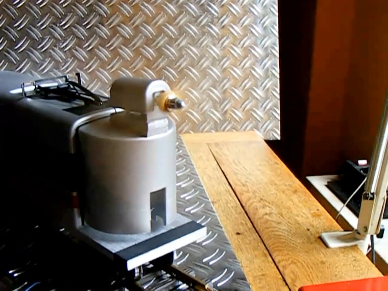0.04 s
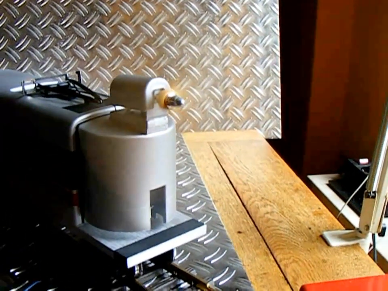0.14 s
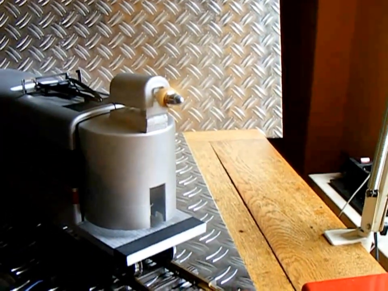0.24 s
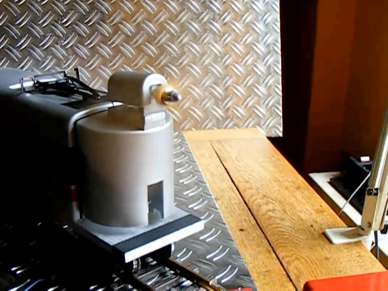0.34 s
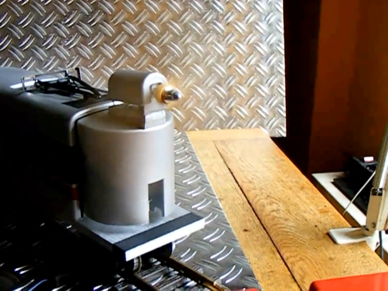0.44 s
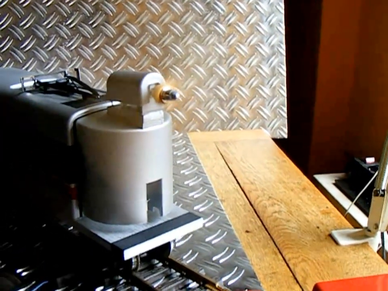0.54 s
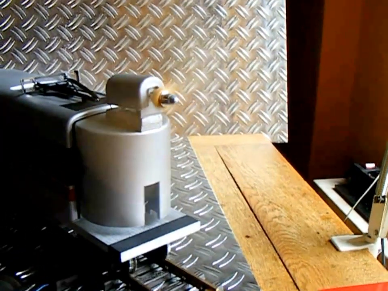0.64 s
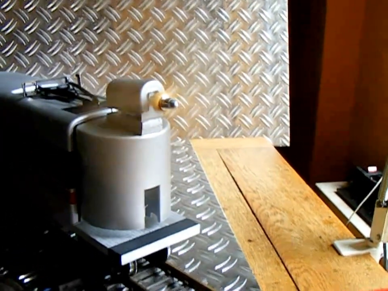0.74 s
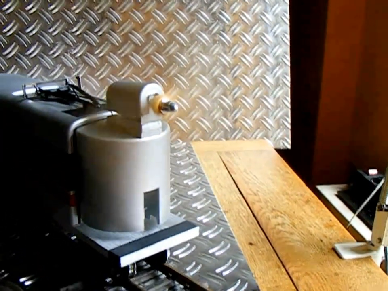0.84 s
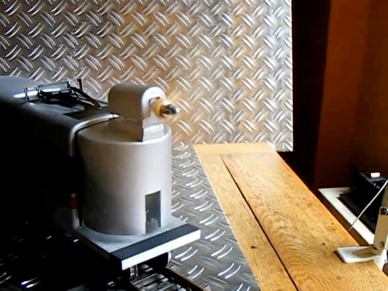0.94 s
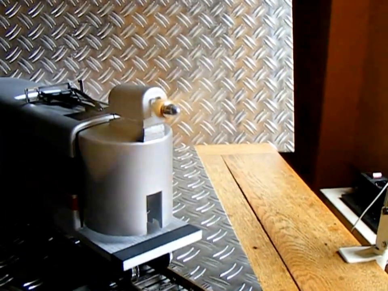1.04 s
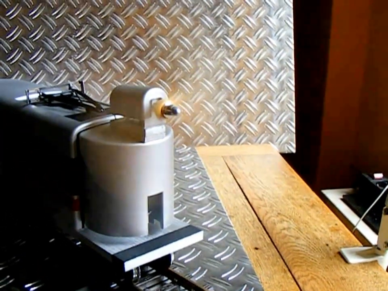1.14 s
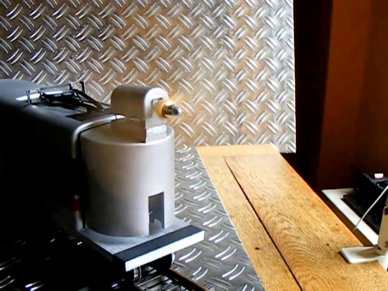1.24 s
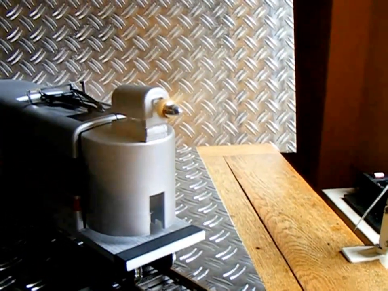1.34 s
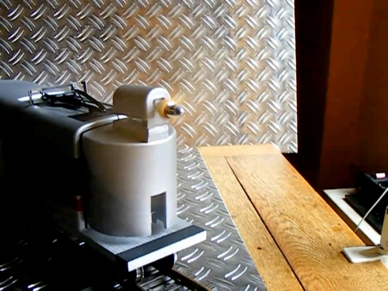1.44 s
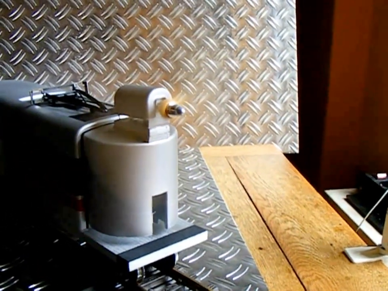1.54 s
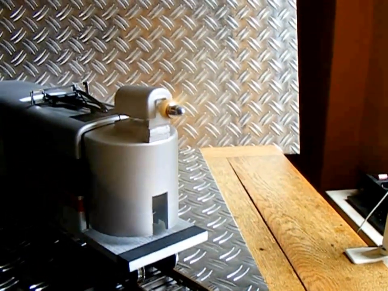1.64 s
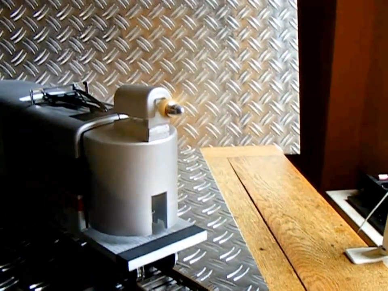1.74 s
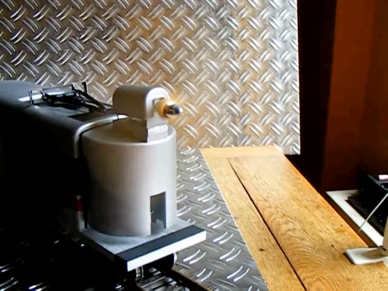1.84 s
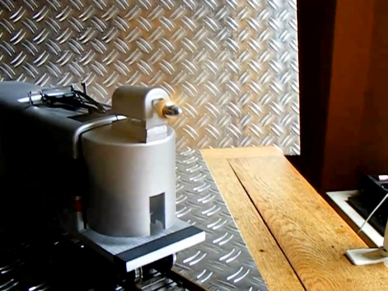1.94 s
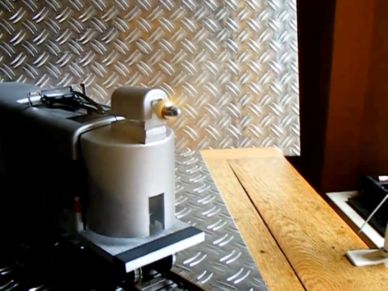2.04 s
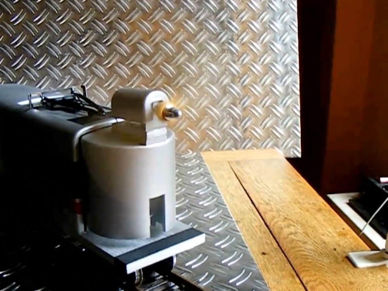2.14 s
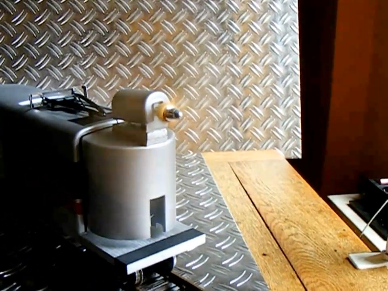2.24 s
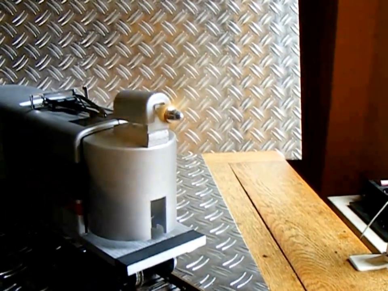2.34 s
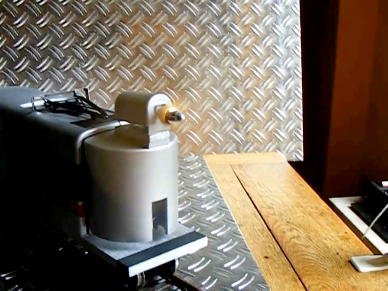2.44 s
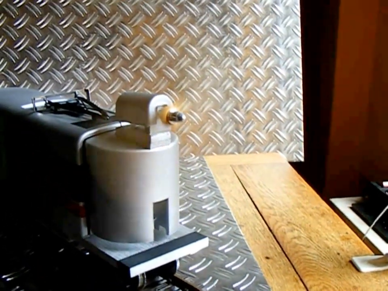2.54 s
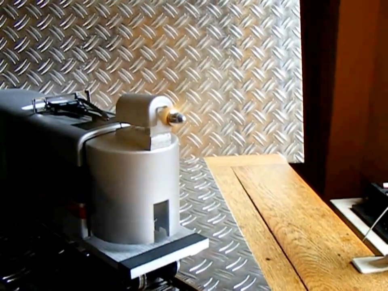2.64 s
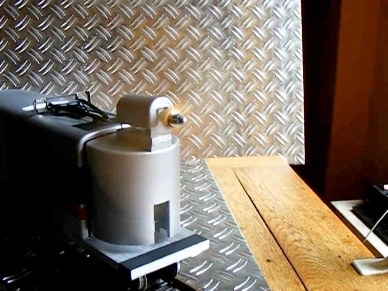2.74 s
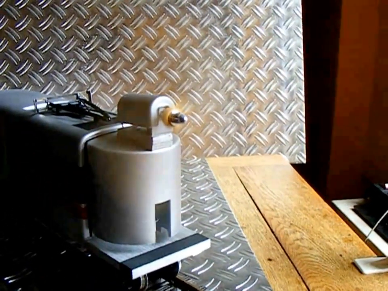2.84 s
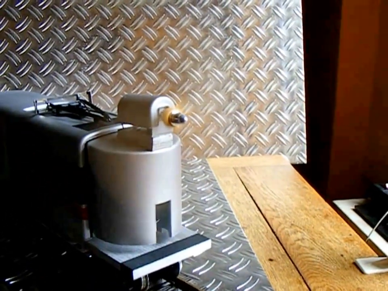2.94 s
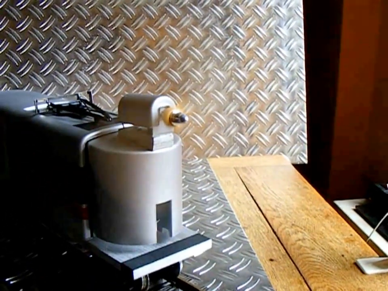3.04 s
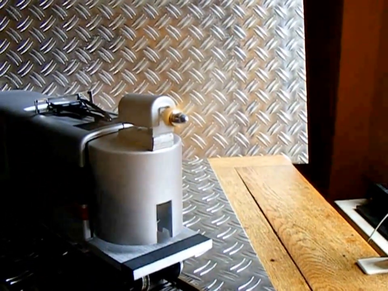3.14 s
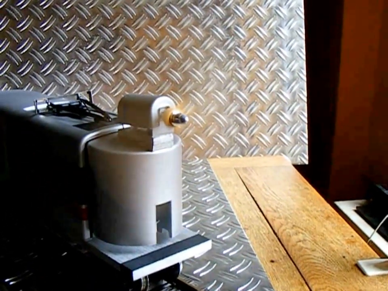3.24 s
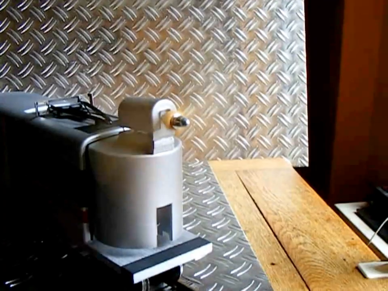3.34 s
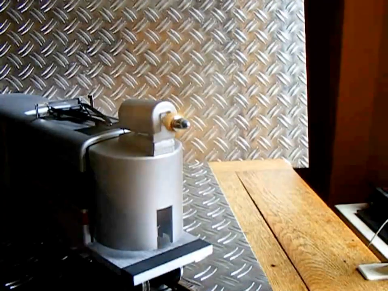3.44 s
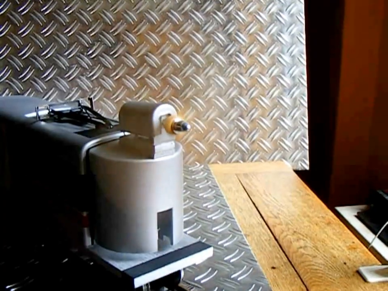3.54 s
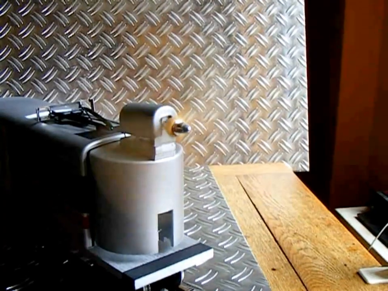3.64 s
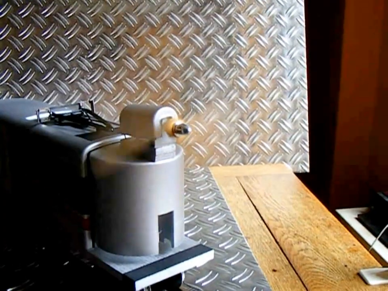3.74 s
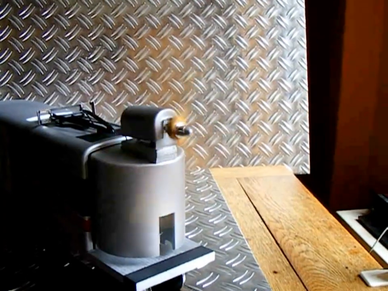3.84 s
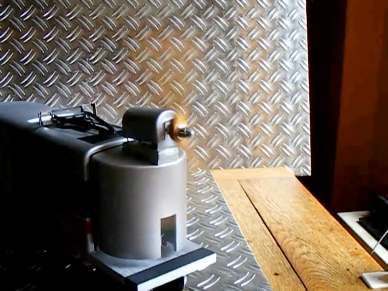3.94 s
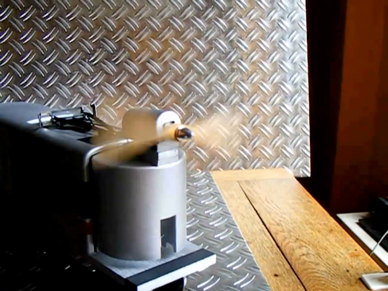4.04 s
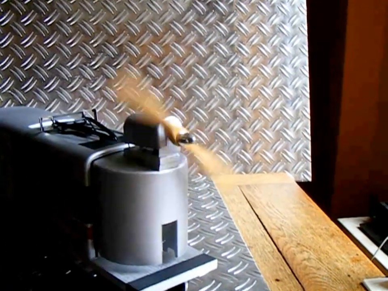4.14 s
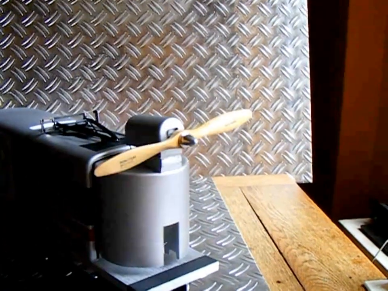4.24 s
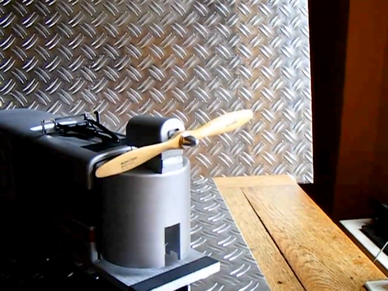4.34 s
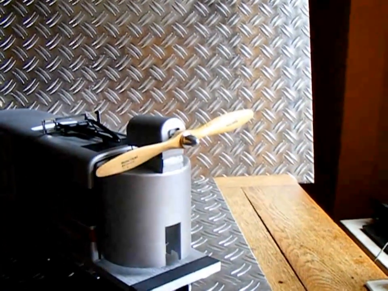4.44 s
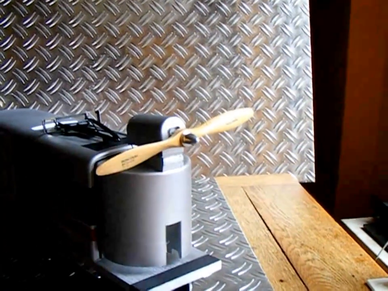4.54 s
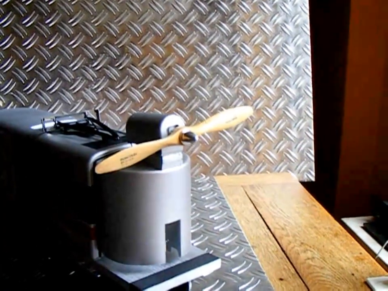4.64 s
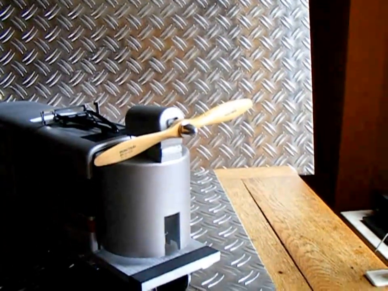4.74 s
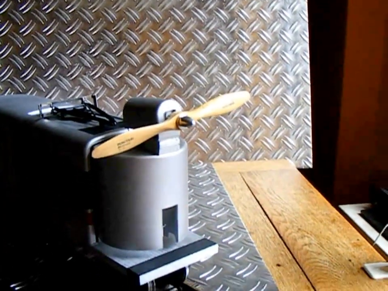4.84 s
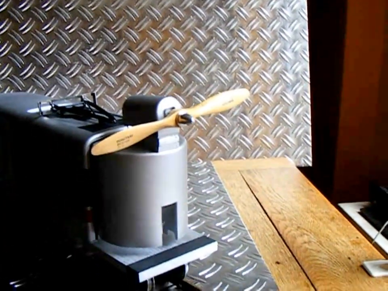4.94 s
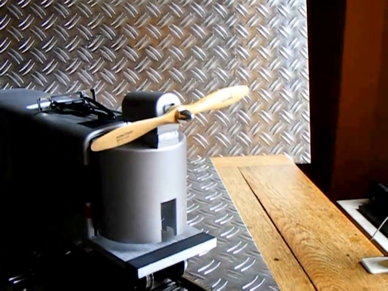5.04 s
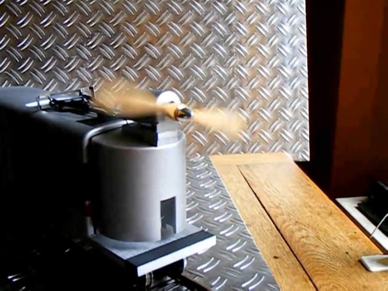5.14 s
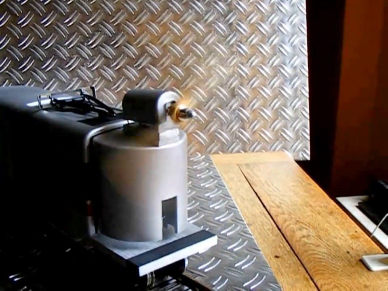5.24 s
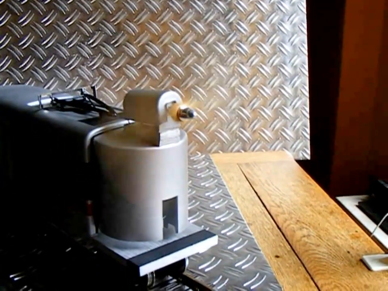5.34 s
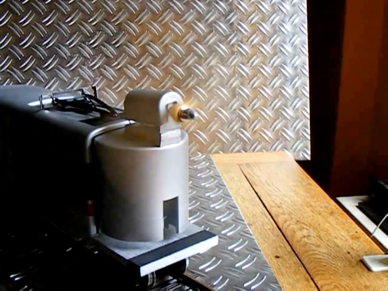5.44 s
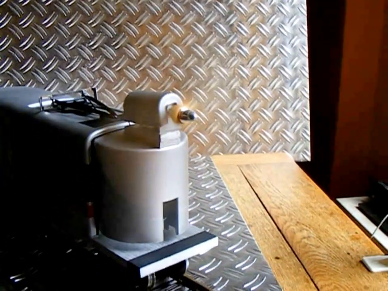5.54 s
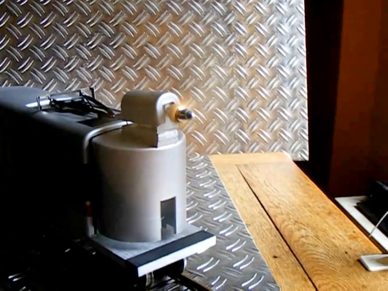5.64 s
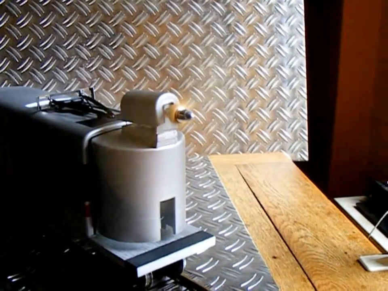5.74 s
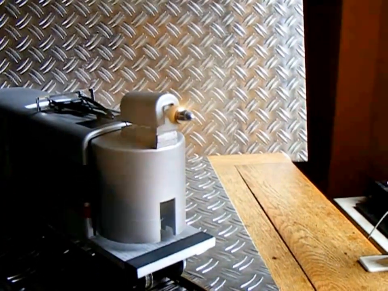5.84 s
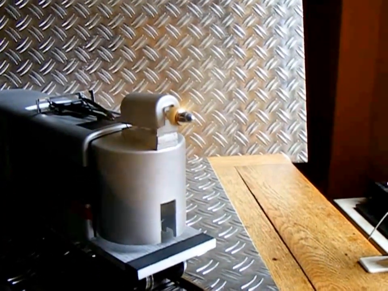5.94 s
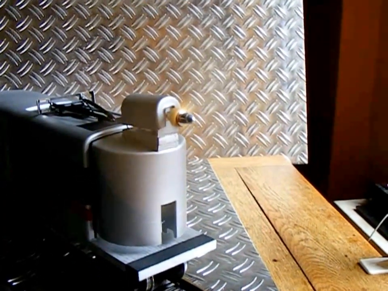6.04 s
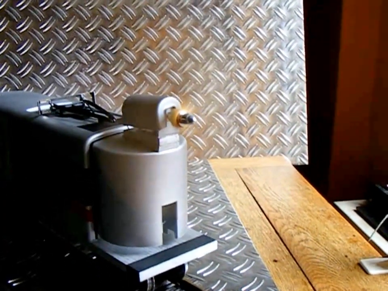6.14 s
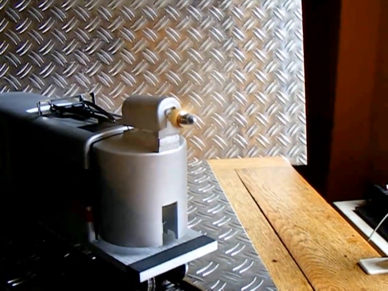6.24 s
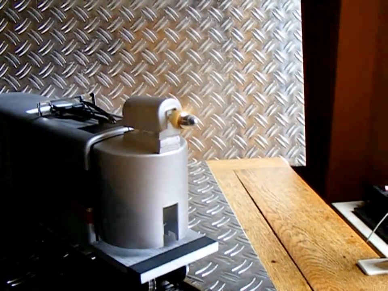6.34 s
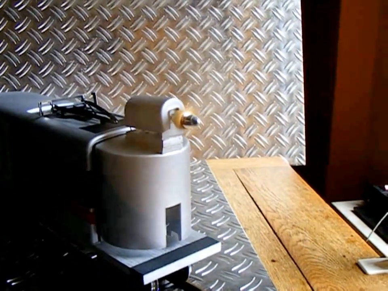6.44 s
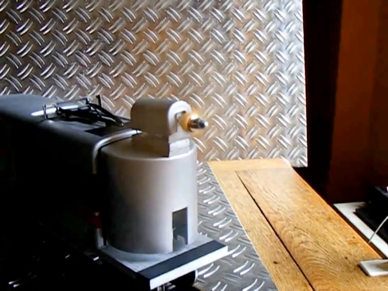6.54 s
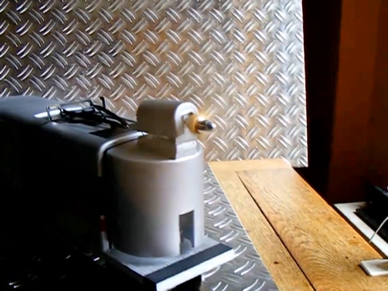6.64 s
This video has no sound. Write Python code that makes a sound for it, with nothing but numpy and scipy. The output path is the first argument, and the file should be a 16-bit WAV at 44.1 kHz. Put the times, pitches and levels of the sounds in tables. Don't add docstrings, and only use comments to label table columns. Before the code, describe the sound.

A cheap, close microphone in a small room picks up a little electric motor with a two-blade wooden propeller on a hollow metal body. It starts already whirring: a gritty buzz, low blade hum and pulsing air rush. The pitch sags from about 0.6 s, swells strongly around 1.3 to 1.5 with a soft knock, dips near 2.3, then surges again around 2.6 and holds near 3. From 3.3 it winds down, slowing into separate flutters and stopping around 4. A sharp click cracks at 4.1, followed by faint ticks over low room hush, then rustles, dull thumps and hard clicks clustered around 4.9 to 5.05. At 5.35 a knock marks the restart; the motor spins up rapidly, slightly muffled, until its housing catches at 5.65 with a fuller, rattling buzz. It steadies, then climbs in pitch from 6.3 to the end. Treble stays rough and metallic.

```python
import sys
import numpy as np
from scipy import signal
from scipy.fft import rfft, irfft, next_fast_len
from scipy.io import wavfile
from scipy.ndimage import uniform_filter1d

SR = 44100
rng = np.random.default_rng(int(sys.argv[2]) if len(sys.argv) > 2 else 0)


def master(y):
    cut = np.clip(np.atleast_2d(y).T, -1, 1)
    pcm = np.round(cut * 32767)
    wavfile.write(sys.argv[1], SR, pcm.astype(np.int16))


def rack_gain(trim_db):
    fader = np.asarray(trim_db, float)
    return 10 ** (fader / 20)


N = 294588
TIME_S = np.arange(N) / SR
RESTART_S, POWER_OFF_S = 4.7, 3.4

# freq_hz, level_db
HUSH_SPECTRUM = [(12, -30), (20, -11), (34, -25), (49, -3.5), (218, -17.5), (282, -11), (889, -15.5),
                 (1020, -17.5), (1100, -19.5), (2270, -19.5), (5400, -28.5), (7020, -58), (11900, -120)]
# start_s, peak_db, pitch_hz
TICKS = [(4.2497, -22, 2300), (4.338, -21, 2310), (4.4512, -20, 1750), (4.5496, -22, 1810),
         (4.6498, -22, 2270), (4.9244, -17, 2300), (4.9335, -5, 2090), (5.0439, -7.5, 2080),
         (5.0754, -21, 2120)]
# start_s, length_s, level_db_rms, centre_hz, width_hz
RUSTLES = [(1.246, 0.092, -39.5, 1700, 1500), (3.866, 0.059, -37.5, 1920, 700),
           (4.689, 0.1, -45, 1240, 1600), (4.901, 0.058, -32, 2000, 900), (4.975, 0.075, -51, 3900, 500),
           (5.027, 0.061, -35, 1860, 800), (5.177, 0.038, -44, 1800, 1000),
           (5.226, 0.032, -40.5, 1430, 1590), (5.26, 0.035, -47, 2320, 600),
           (5.304, 0.089, -39, 1840, 1070)]
# start_s, peak_db, pitch_hz
THUMPS = [(4.338, -43, 50), (4.748, -25, 45), (4.859, -27, 90), (4.973, -24, 45), (5.192, -21, 59.9)]
# start_s, peak_db, pitch_hz, t60_s, rise_s
KNOCKS = [(1.285, -29, 640, .12, .005), (1.28, -22, 238, .2, .02), (1.331, -22, 720, .06, .001),
          (4.1181, -14, 1050, .018, .0007), (4.1186, -20, 1550, .022, .0007),
          (4.1183, -18, 2300, .016, .0007), (4.1183, -20, 3000, .014, .0007), (4.1215, -28, 800, .05, .001),
          (4.124, -26, 300, .12, .004), (4.9765, -7, 1900, .013, .001), (4.977, -27, 3600, .03, .001),
          (4.978, -30, 700, .05, .002), (4.9805, -13, 1800, .022, .001), (4.981, -30, 3880, .07, .001),
          (4.984, -22, 2000, .04, .001), (4.9875, -21, 1850, .03, .001), (5.359, -15, 620, .08, .002),
          (5.367, -24, 700, .08, .003), (5.362, -30, 250, .2, .008), (5.375, -25, 590, .12, .003)]
# start_s, peak_db, low_hz, high_hz, t60_s
CRACKS = [(4.117, -15.5, 700, 3200, 0.024), (4.124, -37, 600, 3100, 0.12), (4.9755, -21, 500, 4297, 0.015),
          (4.977, -31.5, 600, 4100, .18), (5.0425, -39, 1200, 4000, 0.015), (5.36, -33, 300, 3200, 0.045)]
# start_s, target_shaft_hz, lag_s, air_strain_db, body_strain_db
THROTTLE = [(0, 97, 1.4, 0.6, -0.5), (.299, 83.5, 0.088, 0.7, 0.9), (.555, 0, 0.36, -0.3, 1.4),
            (0.841, 15, 0.24, 2, -0.3), (1.314, 130, 0.43, -2, 0), (1.4, 130, .52, 2.5, -3.5),
            (1.46, 78, 0.12, 1.5, 0.8), (1.735, 68, 0.22, 1.1, 0.4), (2.147, 0, .43, -0.8, -0.1),
            (2.39, 62.5, 1.24, -1.2, -1.5), (2.498, 130, 0.6, 2, .6), (2.73, 69.5, 0.053, 0.8, -0.2),
            (2.826, 60, .073, 0.6, -0.2), (2.999, 73.5, 0.081, 1.5, 0.4), (3.298, 0, .326, -1.1, -1.5),
            (3.464, -0.5, 0.47, 0.1, -0.2), (4.07, 0, 0.038, 11, 9), (5.34, 60.5, .19, -3.4, -1),
            (5.64, 60, .19, -2.5, 1.5), (5.802, 60.5, .2, -1.4, -0.2), (6.337, 131, 0.67, -1.2, -0.4),
            (6.49, 89, .136, -2.9, -2.5)]
# full_db, knee_shaft_hz, slope_db_per_db, second_run_db, meeting_share
LOUDNESS_LAWS = [
    (-16, 56.4, 2.5, 0.86, .3),
    (-23.5, 48.8, 2.5, 2.5, .6),
    (-19.5, 53.4, 3.5, 0.5, 0),
]
# centre_hz, width_hz, level_db_rms
BRUSH_WHINE = [(4144, 65, -55), (3900, 92, -61)]
# freq_hz, level_db_per_hz
AIR_SPECTRUM = [(410, -17), (700, -0.5), (750, -6.5), (952, -20.5), (1300, -14), (1720, -12), (2160, -10),
                (3610, -18.5), (5400, -36), (7020, -44), (11900, -120)]
# centre_hz, width_hz, level_db
AIR_PEAKS = [(1750, 520, 0.5), (2080, 220, -48), (2570, 150, -32.5)]
# shaft_hz, level_db
BLADE_TONE = [
    [(12, -56), (40, -48), (60, -36), (64.5, -39.5), (70, -27), (75, -31.5), (78.5, -43), (84, -19.5)],
    [(12, -64), (35, -47), (48, -31.5), (57, -28), (61, -31), (66, -22), (78, -31), (83, -26.5)],
]
# shaft_multiple, level_db
FORCE = [(3, -0.5), (4, -1), (5, -0.5), (6, -5), (7, -1), (8, 0.5), (9, -3.5), (10, -2), (11, -4), (12, -4),
         (13, -2.5), (14, -6), (15, 2), (16, -3.5), (17, 3), (18, -5.5), (19, -4.5), (20, -3.5)]
# centre_hz, width_hz, level_db
COWL_MODES = [(398.6, 140, -13.5), (481.5, 42, -5), (600, 59.4, -2.5), (695.6, 42, -3.5), (900, 105, -13.5),
              (1132.5, 11.3, -7.5)]
# centre_hz, width_hz, level_db
WAGON_MODES = [(137, 21, -10.5), (184.6, 9.5, -8.5), (223.8, 7.1, 1), (258.5, 16.2, 0), (344.3, 105, -7)]

UNBALANCE_DB = (-5.5, 0.1)
CLEAN_DB = (10, 15)
SMEAR_DB_PER_HZ_S = (0.025, 0.07)
PULSE_DB = (1.3, 3.3)
SLAP_DB = (3, 9.5)
SHUDDER_DB = (-57, -43)

WOBBLE_HZ, WOBBLE_WIDTH_HZ, WOBBLE_DB = 62.3, 1.33, 15
CATCH_S, SLACK_DB = 5.65, -9.5
SETTLE_DB, SETTLE_S = -10.5, 0.18
HELD_SHARE = 0.85


def rms_one(x):
    return x / np.sqrt(np.mean(x ** 2) + 1e-20)


def evened(x):
    return x / np.sqrt(uniform_filter1d(x ** 2, size=5000) + 1e-12)


def drift(rate_hz):
    r = np.exp(-80 * np.pi * rate_hz / SR)
    noise = rng.standard_normal(N // 40 + 2002)
    slow = signal.lfilter([1], [1, -2 * r, r * r], noise)[2000:]
    return np.interp(np.arange(N) / 40, np.arange(len(slow)), rms_one(slow))


def filtered(x, order, hz, kind="band"):
    return signal.sosfilt(signal.butter(order, hz, kind, fs=SR, output="sos"), x)


def coloured(spectrum):
    hz, db = np.transpose(spectrum)
    size = next_fast_len(N)
    bins_hz = np.arange(1, size // 2 + 2) * SR / size
    gain = rack_gain(np.interp(np.log(bins_hz), np.log(hz), db))
    return rms_one(irfft(rfft(rng.standard_normal(size)) * gain, size)[:N])


def resonate(x, modes):
    out = 0
    for k, (hz, width_hz, db) in enumerate(modes):
        r = np.exp(-np.pi * width_hz / SR)
        b = (-1) ** k * rack_gain(db) * (1 - r * r) / 2 * np.array([1, 0, -1])
        out = out + signal.lfilter(b, [1, -2 * r * np.cos(2 * np.pi * hz / SR), r * r], x)
    return out


def resonate_twice(x, hz, width_hz):
    mode = [(hz, width_hz, 0)]
    return resonate(resonate(x, mode), mode)


def strike(start_s, db, hz, t60_s, rise_s):
    out, at = np.zeros(N), round(start_s * SR)
    t = np.arange(min(N - at, SR // 2)) / SR
    envelope = rack_gain(db - 60 * t / t60_s) * np.tanh(t / rise_s) ** 2
    out[at:at + len(t)] = envelope * np.sin(2 * np.pi * hz * t)
    return out


def by_run(pair):
    return np.where(TIME_S > RESTART_S, pair[1], pair[0])


def room_hush():
    hush = rack_gain(-45.5 + 0.5 * drift(3.1)) * coloured(HUSH_SPECTRUM)
    draught = filtered(rng.standard_normal(N), 2, [40, 160])
    return hush + rack_gain(-53.5 + 1.4 * drift(6.4)) * rms_one(draught)


def room(x):
    t = np.arange(SR // 2) / SR
    t60_s = 0.39
    tail = rng.standard_normal(len(t)) * rack_gain(-60 * t / t60_s) * (t > 0.006)
    return signal.fftconvolve(x, tail / np.sqrt(np.sum(tail ** 2)))[:N]


def hand():
    out = sum(strike(s - 0.0006, db - 8.5, hz, 0.019, 0.0011) for s, db, hz in TICKS)
    out += sum(strike(s, db, hz, 1.7 / hz, 0.0014) for s, db, hz in THUMPS)
    grit = rng.standard_normal(N) * rack_gain(1.8 * drift(90))
    for start_s, length_s, db, hz, width_hz in RUSTLES:
        phase = np.clip((TIME_S - start_s) / length_s, 0, 1)
        swell = np.sqrt(np.sin(np.pi * phase) + 1e-12)
        out += rack_gain(db) * swell * rms_one(resonate_twice(grit, hz, width_hz))
    return out


def hard_contacts():
    out = sum(strike(*row) for row in KNOCKS)
    white = rng.standard_normal(N)
    for start_s, db, low_hz, high_hz, t60_s in CRACKS:
        since_s = np.maximum(TIME_S - start_s, 0)
        envelope = rack_gain(db - 60 * since_s / t60_s) * np.tanh(since_s / 0.00024)
        out += envelope * rms_one(filtered(white, 4, [low_hz, high_hz]))
    return out


def throttle():
    out, now_hz = np.zeros((3, N)), 70
    for start_s, goal_hz, lag_s, air_db, body_db in THROTTLE:
        at = round(start_s * SR)
        now_hz = out[0, at] if at else now_hz
        remaining = np.exp(-(TIME_S[at:] - start_s) / max(lag_s, 0.02))
        out[0, at:] = goal_hz + (now_hz - goal_hz) * remaining
        out[1:, at:] = [[air_db], [body_db]]
    return uniform_filter1d(out, size=3000, mode="nearest")


def meeting(speed_hz, modes):
    coarse_hz = speed_hz[::64]
    power = 0
    for hz, width_hz, db in modes:
        for k, push_db in FORCE:
            detuning = 2 * (k * coarse_hz - hz) / width_hz
            power = power + rack_gain(2 * (db + push_db)) / (1 + detuning ** 2)
    db = uniform_filter1d(10 * np.log10(power / np.median(power)), size=30)
    return np.repeat(np.clip(db, -12, 12), 64)[:N]


def below_full_db(speed_hz, knee_hz):
    return -2.2 * np.log10(1 + (knee_hz / (speed_hz + 0.71)) ** 9.04)


def loudness(speed_hz, air_strain_db, body_strain_db):
    strains_db = (body_strain_db, body_strain_db, air_strain_db)
    bodies = (COWL_MODES, WAGON_MODES, WAGON_MODES)
    levels = []
    for law, modes, strain_db in zip(LOUDNESS_LAWS, bodies, strains_db):
        full_db, knee_hz, slope, second_db, share = law
        level_db = full_db + slope * below_full_db(speed_hz, knee_hz) + strain_db
        levels.append(level_db + by_run((0, second_db)) + share * meeting(speed_hz, modes))
    cowl_db, wagon_db, air_db = levels
    before_catch = np.clip((CATCH_S - TIME_S) / 0.016, 0, 1)
    after_start = np.clip((TIME_S - CATCH_S + 0.26) / 0.12, 0, 1)
    slack_db = by_run((0, SLACK_DB)) * before_catch * after_start
    return cowl_db + slack_db, wagon_db + 0.69 * slack_db, air_db


def cleanness(speed_hz):
    change_hz_s = uniform_filter1d(np.gradient(speed_hz) * SR, size=4000)
    unsettled = np.exp(-(np.maximum(TIME_S - CATCH_S, 0) / SETTLE_S) ** 2)
    clean_db = by_run(CLEAN_DB) - by_run(SMEAR_DB_PER_HZ_S) * abs(change_hz_s)
    clean_db += 0.7 * below_full_db(speed_hz, LOUDNESS_LAWS[2][1])
    clean_db += by_run((0, SETTLE_DB)) * unsettled
    return np.maximum(clean_db, -3)


def bearing(air_db):
    hiss = rms_one(filtered(rng.standard_normal(N), 2, (644, 1700)))
    return rack_gain(-31.5 + 0.38 * (air_db - LOUDNESS_LAWS[2][0]) + 1.4 * drift(30)) * hiss


def brushes():
    white = rng.standard_normal(N)
    whine = 0
    for hz, width_hz, db in BRUSH_WHINE:
        whine = whine + rack_gain(db + 1.4 * drift(8.6)) * rms_one(resonate_twice(white, hz, width_hz))
    unpowered = (TIME_S > POWER_OFF_S) & (TIME_S < RESTART_S)
    return rack_gain(-5 * unpowered) * whine


def slap(turn_rad):
    lag_turns, scatter_samples, scatter_db = 0.169, 4.0, 2.5
    at = np.flatnonzero(np.diff(np.floor(turn_rad / (2 * np.pi) - lag_turns)))
    chance = rng.standard_normal((700, 2))[:len(at)]
    clicks = np.zeros(N) + 1e-18
    late = (scatter_samples * chance[:, 0]).astype(int)
    clicks[np.clip(at + late, 0, N - 1)] = rack_gain(scatter_db * chance[:, 1])
    pulse = filtered(clicks, 3, (390, 2000))
    return pulse / np.percentile(abs(pulse), 99.5)


def air(turn_rad):
    pulse = np.cos(turn_rad) + 0.4 * np.cos(3 * turn_rad)
    pulse += 0.051 * np.cos(2 * turn_rad) + 0.1 * np.cos(4 * turn_rad)
    chop = rack_gain(by_run(PULSE_DB) * pulse + 0.61 * drift(69) + 0.93 * drift(3.8))
    rush = coloured(AIR_SPECTRUM) * chop / np.sqrt(uniform_filter1d(chop ** 2, size=5000))
    rush = filtered(rush, 3, 300, "high")
    return rms_one(rush + resonate(rush, AIR_PEAKS))


def blade_tone(speed_hz, turn_rad):
    blade_db = by_run([np.interp(speed_hz, *np.transpose(rows)) for rows in BLADE_TONE])
    blade_db -= 40 * (speed_hz < 8)
    return rack_gain(blade_db + 4.0) * np.sin(2 * turn_rad)


def table_shudder(turn_rad):
    return rack_gain(by_run(SHUDDER_DB) + 2.5 * drift(8)) * np.sin(turn_rad)


def rotor_force(speed_hz, turn_rad):
    wobble_db = WOBBLE_DB * np.exp(-((speed_hz - WOBBLE_HZ) / WOBBLE_WIDTH_HZ) ** 2)
    wobble_db *= by_run((1, 0))
    unbalance_db = by_run(UNBALANCE_DB)
    force = 0
    for k, db in FORCE:
        order_db = db + unbalance_db * (k % 2 + (k > 12)) + wobble_db * (k == 3)
        level = rack_gain(order_db + 2.0 * drift(4.1))
        phase = rng.uniform(-1.06, 1.0) + 0.33 * drift(4.1)
        force = force + level * np.cos(k * turn_rad + phase)
    return force


def loose_play(turn_rad):
    beat_db = 1.17 * np.cos(turn_rad) + 2.0 * np.cos(3 * turn_rad + 6.1)
    return rng.standard_normal(N) * rack_gain(beat_db + 2.0 * drift(45))


def shaken(force, play, clean_db, modes, band_hz, held_share):
    def ring(drive, share):
        held = share * by_run((1, 0)) * resonate(drive, modes[1:2])
        return evened(filtered(resonate(drive, modes) + held, 2, band_hz))

    lines, rattle = ring(force, held_share), ring(play, 0.24 * held_share)
    return (rack_gain(clean_db) * lines + rattle) / np.sqrt(1 + rack_gain(2 * clean_db))


def housing(speed_hz, turn_rad, cowl_db, wagon_db):
    force, play = rotor_force(speed_hz, turn_rad), loose_play(turn_rad)
    clean_db = cleanness(speed_hz)
    wagon = shaken(force, play, clean_db, WAGON_MODES, [95, 420], 0)
    cowl = shaken(force, play, clean_db, COWL_MODES, [330, 1500], HELD_SHARE)
    return rack_gain(cowl_db - 0.43) * cowl + rack_gain(wagon_db) * wagon


def scene():
    speed_hz, air_strain_db, body_strain_db = throttle()
    turn_rad = 2 * np.pi * np.cumsum(speed_hz) / SR
    cowl_db, wagon_db, air_db = loudness(speed_hz, air_strain_db, body_strain_db)
    turning = np.clip((cowl_db + 56.5) / 14, 0, 1)

    near = hand() + hard_contacts()
    mix = room_hush() + near + rack_gain(-10) * room(near)
    mix += turning * (bearing(air_db) + brushes() + table_shudder(turn_rad))
    mix += rack_gain(air_db + 2.0) * (air(turn_rad) + rack_gain(by_run(SLAP_DB)) * slap(turn_rad))
    mix += blade_tone(speed_hz, turn_rad) + housing(speed_hz, turn_rad, cowl_db, wagon_db)
    return mix[None]


def band_limit(x):
    return signal.sosfilt(signal.butter(12, 15780, fs=SR, output="sos"), x)


def record(dry):
    capture_hz, offset = 11024, -0.0162
    kept = filtered(dry[0], 6, 5300, "low")
    lift = kept - 0.8 * np.gradient(np.gradient(kept))
    sample_s = np.arange(-1, N / SR * capture_hz + 1) / capture_hz
    fine = signal.resample_poly(np.tanh(lift / 1.1) * 1.1, 4, 1)
    samples = np.interp(sample_s, np.arange(len(fine)) / (4 * SR), fine)
    mix = np.interp(TIME_S, sample_s, samples) + offset
    return band_limit(mix[None])


dry = scene()
out = record(dry)
master(out)
```